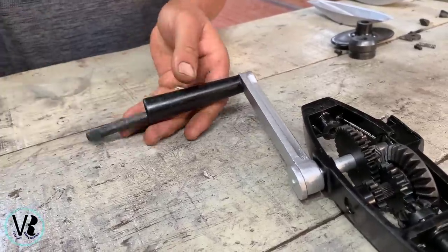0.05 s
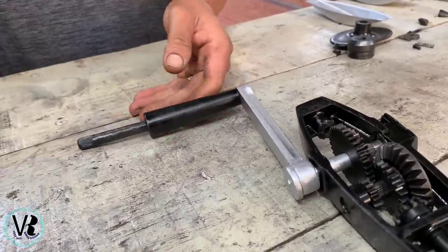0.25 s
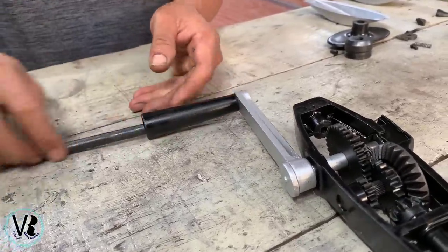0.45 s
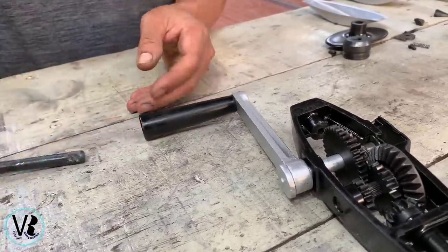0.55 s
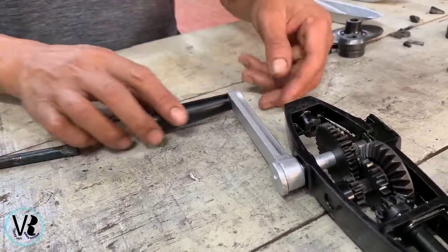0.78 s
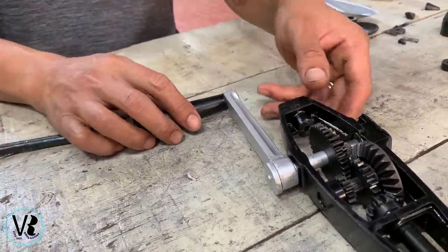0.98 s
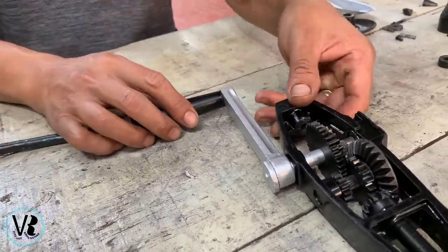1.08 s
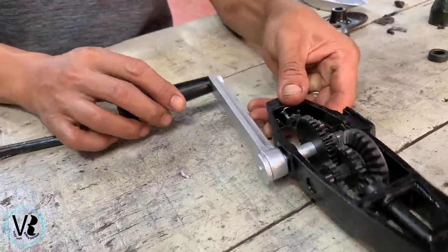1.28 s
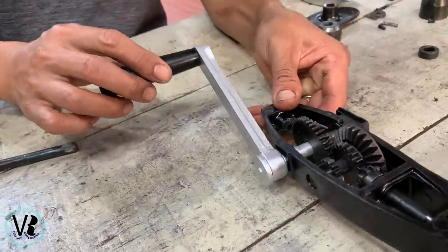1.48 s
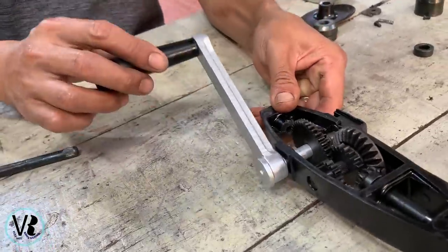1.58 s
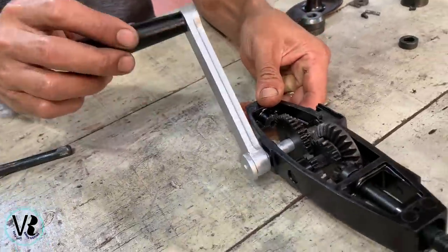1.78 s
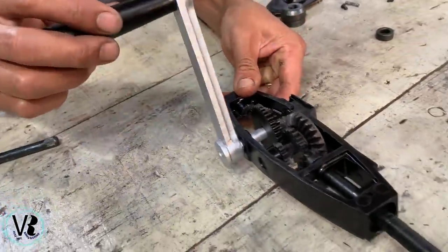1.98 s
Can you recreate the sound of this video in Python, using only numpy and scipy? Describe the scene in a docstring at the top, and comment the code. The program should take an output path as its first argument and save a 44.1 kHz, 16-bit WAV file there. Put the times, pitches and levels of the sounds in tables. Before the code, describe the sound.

An old hand drill knocks and slides on a wooden workbench, close by in a small quiet room. At about 0.2 seconds its crank drops with a loud, briefly ringing clatter. More bumps and scrapes lead to a steel rod clacking down at 0.65 seconds. Softer dragging fades by 1.3 seconds, leaving very faint gear friction. Thin, barely audible high chirps come and go from 0.8 to 2 seconds.

```python
"""Hand drill on a workbench.

An old hand drill bumps and slides on wooden boards in a small, quiet room. Its crank drops and clatters; a
steel rod is put down with a clack. Each contact rings modes of the boards, plus those of the frame or rod when
these land. The drill is dragged and its gears sing faintly by friction. Thin high chirps, perhaps distant
birds, come and go; one squeak near 1.52 s goes with a scrape."""
import sys
import numpy as np
from scipy import signal
from scipy.fft import rfft, irfft
from scipy.io import wavfile

SR = 44100
rng = np.random.default_rng(int(sys.argv[2]) if len(sys.argv) > 2 else 0)


def digitize_waveform(pressure):
    """Quantize a signal to 16-bit integers and store it at the path in sys.argv[1].

    Rows of a 2-D input are taken as channels; values are limited to [-1, 1].
    """
    field = np.atleast_2d(pressure).T
    bounded = np.clip(field, -1, 1)
    quanta = np.round(bounded * 32767).astype(np.int16)
    wavfile.write(sys.argv[1], SR, quanta)


N = 90404
HZ = np.fft.rfftfreq(8192, 1 / SR)  # filter design grid

# board modes: pitch_hz, level_db, t60_s
BENCH_MODES = [(85.6, 13.5, 0.52), (214, -1, 0.22), (289.7, -3.5, 0.46), (475.6, 3.5, 0.35),
               (521, 3, 0.032), (644, -2, 0.14), (846, 0.5, 0.072), (1058, -4.5, 0.25), (1110, -1, 0.1)]
# decay of dense short modes: freq_hz, t60_s
SCATTER_DECAY = [(100, 0.3), (400, 0.064), (1200, 0.084), (4000, 0.095), (12000, 0.025)]
# room decay: freq_hz, t60_s
ROOM_DECAY = [(90, 0.36), (300, 0.67), (1000, 0.36), (3000, 0.39), (7000, 0.18), (14000, 0.12)]


def amp(db):
    """Decibels to gain."""
    return 10 ** (np.asarray(db) / 20)


def unit(x):
    """Scale to rms 1."""
    return x / np.sqrt(np.mean(x ** 2) + 1e-20)


def read(points, hz):
    """Interpolate a table over log frequency."""
    freq_hz, value = np.transpose(points)
    return np.interp(np.log(hz + 1), np.log(freq_hz + 1), value)


def add(mix, start_s, sound):
    """Mix a sound in at start_s."""
    part = mix[:, max(round(start_s * SR), 0):][:, :sound.shape[-1]]
    part += sound[..., :part.shape[1]]


def colour(x, gain_db):
    """Minimum-phase filter, gain given on the grid HZ."""
    log_gain = np.log(amp(np.r_[gain_db, gain_db[-2:0:-1]]))
    response = np.exp(np.conj(signal.hilbert(log_gain)))[:len(HZ)]
    taps = irfft(response)[:len(HZ)]
    return signal.fftconvolve(x, taps[None], axes=1)[:, :x.shape[1]]


def shelves(bass_db, treble_db, bass_hz=450, treble_hz=1800):
    """Shelf curve in dB: heavy contacts have more bass, hard ones more treble."""
    return bass_db / (1 + (HZ / bass_hz) ** 4) + treble_db / (1 + (treble_hz / (HZ + 1)) ** 4)


def close_pair(x, bend_s=0):
    """Close source, left leading. Bending waves lag by bend_s at 1 kHz, more in the bass."""
    # phase lead of left over right: freq_hz, lead_rad
    left_lead = [(100, 0.6), (700, 0.5), (1000, 0.82), (1400, 1.25), (2000, 2.11), (2800, 3.13),
                 (4000, 4.7), (5600, 8.47), (8000, 11.05)]
    size = 2 * len(x)
    hz = np.fft.rfftfreq(size, 1 / SR)
    left = rfft(x, size) * np.exp(-4j * np.pi * bend_s * np.sqrt(1000 * hz))
    right = left * np.exp(-1j * read(left_lead, hz))
    return irfft([left, right])[:, :len(x)]


def diffuse(size):
    """White noise from all sides, alike left and right in the bass."""
    # left-right likeness: freq_hz, correlation
    likeness = [(100, 0.99), (350, .8), (600, 0.67), (1000, 0.18), (2000, -0.5), (2800, -0.25),
                (4500, 0.27), (12000, -0.37)]
    left, other = rfft(rng.standard_normal((2, size)))
    correlation = np.clip(read(likeness, np.fft.rfftfreq(size, 1 / SR)), -1, 1)
    right = correlation * left + np.sqrt(1 - correlation ** 2) * other
    return irfft([left, right], size)


def tail(decay, size):
    """Diffuse decay of about unit energy, each band at its own rate."""
    hz, t, bands = signal.stft(diffuse(size), SR, nperseg=256)
    tau_s = read(decay, hz)[:, None] / np.log(1000)
    fading = bands * np.exp(-t / tau_s) * np.sqrt(2 / (tau_s * SR))
    return signal.istft(fading, SR, nperseg=256)[1][:, :size]


def room_tone(level_db=-58):
    """Steady diffuse noise, mostly bass."""
    # noise spectrum: freq_hz, relative_db
    spectrum = [(25, -34), (60, -14), (108, 0), (170, -5), (340, -5.5), (460, -12), (700, -15),
                (1300, -19.5), (2000, -19), (3400, -32), (5000, -30), (7200, -30.5), (9000, -34.5),
                (11000, -42), (13000, -62.5), (16000, -74.5)]
    return amp(level_db) * unit(colour(diffuse(N), read(spectrum, HZ)))


def reverb(x, delay_s=.008):
    """Short room reverberation, fed by the left channel."""
    # reverberation colour: freq_hz, gain_db
    tone = [(90, -20.5), (250, -12.5), (500, -17), (1200, -14), (2600, -15.5), (3900, -19), (4700, -10),
            (6500, -7.5), (14000, -9)]
    response = colour(tail(ROOM_DECAY, SR), read(tone, HZ))
    out = np.zeros((2, N))
    add(out, delay_s, signal.fftconvolve(x[:1], response, axes=1))
    return out


def chirps(direct_db=-10, echo_db=-1):
    """Thin gliding whistles, blurred by the room."""
    # whistles: start_s, length_s, start_hz, end_hz, width_hz, level_db; the one at 1.517 s is a squeak of the
    # scrape
    whistles = [(0.813, 0.057, 6660, 5770, 700, -65.5), (1.027, 0.063, 6330, 7560, 304, -64),
                (1.137, 0.058, 7170, 7650, 403, -68), (1.161, 0.048, 6360, 6490, 400, -64),
                (1.292, 0.064, 7130, 6240, 394, -67.5), (1.517, 0.044, 5100, 5010, 700, -72),
                (1.658, 0.081, 7200, 5870, 503, -68), (1.794, 0.033, 6200, 6350, 400, -72.5),
                (1.822, 0.033, 7250, 7080, 200, -63), (1.853, 0.051, 6620, 6450, 180, -60.5),
                (1.974, 0.046, 6800, 6180, 1200, -71.5)]
    out = np.zeros((2, N))
    for start_s, length_s, start_hz, end_hz, width_hz, level_db in whistles:
        progress = np.arange(0, length_s, 1 / SR) / length_s
        lowpass = signal.butter(2, width_hz / 2, fs=SR, output="sos")
        flutter = signal.sosfilt(lowpass, rng.standard_normal(SR))[-len(progress):]
        pitch_hz = start_hz + (end_hz - start_hz) * progress
        whistle = np.sin(2 * np.pi * np.cumsum(pitch_hz) / SR)
        add(out, start_s, amp(level_db) * unit(whistle * flutter * np.sin(np.pi * progress) ** .5))
    echo = signal.fftconvolve(out, tail(ROOM_DECAY, SR), axes=1)[:, :N]
    return amp(direct_db) * out + amp(echo_db) * echo


def gears(width_hz=14):
    """Light friction rings narrow gear resonances as the crank turns."""
    # gear catches: start_s, length_s, pitch_hz, level_db
    catches = [(1.35, 0.081, 2182, -71.5), (1.409, 0.062, 1547, -71), (1.487, 0.071, 2035, -71),
               (1.491, 0.18, 1550, -71), (1.507, .33, 1755, -73.5), (1.566, 0.072, 2640, -74.5)]
    out = np.zeros((2, N))
    for start_s, length_s, pitch_hz, level_db in catches:
        progress = np.arange(0, length_s, 1 / SR) / length_s
        resonator = signal.iirpeak(pitch_hz, pitch_hz / width_hz, SR)
        song = signal.lfilter(*resonator, diffuse(SR))[:, -len(progress):]
        add(out, start_s, amp(level_db) * unit(song * np.sin(np.pi * progress) ** .5))
    return out


def ring(modes, click_db, bend_s=.00099):
    """A click and its damped modes, carried through the boards as a bending wave."""
    t = np.arange(SR // 2) / SR
    ringing = np.zeros(len(t))
    for pitch_hz, level_db, t60_s in modes:
        tau_s = t60_s / np.log(1000)
        ringing += amp(level_db) * 2 / (tau_s * SR) * np.exp(-t / tau_s) * np.cos(2 * np.pi * pitch_hz * t)
    return close_pair(ringing + amp(click_db) * signal.unit_impulse(len(t)), bend_s)


def slides(grains_per_s=1200, spread_db=2.5, spots=4):
    """Metal catches on wood grain: streams of tiny clicks at spots that each ring differently."""
    # sliding strokes: start_s, length_s, level_db, bass_db, treble_db
    strokes = [(0.071, 0.34, -44, 12.5, 0), (0.442, 0.025, -46, 3, 6), (0.467, 0.071, -37.5, -0.5, 3),
               (0.532, 0.15, -42.5, 4, 2), (0.74, 0.12, -48, 12.5, 6), (0.899, 0.11, -41, 1.5, -4),
               (0.997, 0.055, -43.5, 6.5, -5), (1.055, 0.15, -60.5, 15, -26),
               (1.183, 0.14, -55.5, 17.5, 12.5), (1.518, 0.06, -69, 6, 23)]
    # friction colour: freq_hz, relative_db
    tone = [(40, -40), (90, -9), (130, -12), (400, -7.5), (560, 0), (700, 4.5), (850, -3), (1140, 1),
            (1300, -8.5), (2100, -13), (2450, -11), (4000, -24.5), (8000, -32), (15000, -56)]
    out = np.zeros((2, N))
    direct = ring(BENCH_MODES, click_db=-4)
    size = direct.shape[1]
    t = np.arange(size) / SR
    for start_s, length_s, level_db, bass_db, treble_db in strokes:
        progress = np.minimum(t / length_s, 1)
        pressure = abs(np.sin(np.pi * progress ** .8)) ** 1.1  # one arch, peaking early
        tone_db = read(tone, HZ) + shelves(bass_db, treble_db)
        for _ in range(spots):
            signs = rng.choice([-1, 1], size)
            strengths = amp(spread_db * np.minimum(rng.exponential(1, size), 3))
            caught = rng.random(size) < grains_per_s / spots / SR
            force = pressure * unit(signs * strengths * caught) / np.sqrt(spots)
            body = colour(direct + tail(SCATTER_DECAY, size), tone_db)
            body /= np.linalg.norm(body[0])
            add(out, start_s, amp(level_db) * signal.fftconvolve(force[None], body, axes=1))
    return out


def impacts(hits, tone, modes, click_db, rattle_db, scatter_db):
    """Each hit clicks, rattles briefly and rings clear modes plus a scatter of short ones."""
    # contact rattle: freq_hz, t60_s
    rattle_decay = [(100, 0.035), (600, 0.06), (2500, 0.0062), (10000, 0.06)]
    out = np.zeros((2, N))
    direct = ring(modes, click_db)
    size = direct.shape[1]
    for start_s, level_db, bass_db, treble_db in hits:
        rattle = amp(rattle_db) * close_pair(tail(rattle_decay, size)[0])
        scatter = amp(scatter_db) * tail(SCATTER_DECAY, size)
        tone_db = read(tone, HZ) + shelves(bass_db, treble_db)
        add(out, start_s, amp(level_db) * colour(direct + rattle + scatter, tone_db))
    return out


def bumps():
    """Light knocks of the drill, and the steel rod's tip falling on the bench, ring the boards."""
    # knocks: start_s, level_db, bass_db, treble_db
    hits = [(.0375, 14, 3, -0.5), (.0575, 8, 4, 1.5), (.0835, -10.5, -2.5, 20), (.094, -12, -1, 17.5),
            (.1003, 0, 2.5, -17.5), (.1272, 1.5, 10.5, -22), (.153, -0.5, 2, -0.5), (.173, -9, 2.5, -3.5),
            (.2025, 10.5, -4.5, 9), (.4765, 4, -19.5, 5.5), (.5575, 10, -5, 9), (.782, -6.5, -2, -7),
            (.8158, -3, 0.5, 1), (1.191, -15, -15, 1)]
    # contact colour: freq_hz, gain_db
    tone = [(40, -43), (90, -12.5), (170, -6), (300, -3.5), (500, 1.5), (1000, 0.5), (1450, -8.5),
            (1800, -12), (2500, -11.5), (4000, -29.5), (8000, -44), (15000, -55)]
    return impacts(hits, tone, BENCH_MODES, click_db=-18, rattle_db=-7.5, scatter_db=-4.5)


def rod_clack():
    """The steel rod is put down and settles; rod and boards ring."""
    # rod contacts: start_s, level_db, bass_db, treble_db
    hits = [(.6410, 18, -1, -1), (.6470, -9, -7.5, -11), (.6515, 0.5, -1.5, -4)]
    # contact colour: freq_hz, gain_db
    tone = [(40, -23), (100, -11.5), (300, -5), (600, -5), (1050, -1.5), (1750, -4), (2400, 5), (3000, 1),
            (3900, -6), (4500, -13), (5600, -12.5), (8000, -27), (10500, -22), (15000, -51.5)]
    # rod modes: pitch_hz, level_db, t60_s
    rod_modes = [(1036, 4, 0.067), (2370, -5, 0.025), (2593, 7, 0.023), (3552, -1, 0.028),
                 (3935, 11.5, 0.016), (4520, -20, 0.057), (5960, -14, 0.048), (6620, 10, 0.055)]
    return impacts(hits, tone, BENCH_MODES + rod_modes, click_db=-12, rattle_db=-6.5, scatter_db=-5.5)


def crank_drop():
    """The crank drops, lands and clatters; drill frame and boards ring."""
    # crank contacts: start_s, level_db, bass_db, treble_db
    hits = [(.22377, 23, -10.5, -8.5), (.22718, 16, -10, -9), (.23176, 22, 5.5, 2), (.23505, 22.5, 6, -1.5),
            (.23879, 17.5, 2, -10.5), (.24268, 2.5, -9.5, -7), (.24472, 10.5, -9, -3), (.2495, 9, -3.5, -4),
            (.2595, 8, -0.5, -6)]
    # contact colour: freq_hz, gain_db
    tone = [(40, -46.5), (90, -9.5), (130, -3), (200, -6), (340, -7), (405, -5), (490, 2), (570, -6.5),
            (800, -2.5), (1010, -13), (1170, -5), (1600, -3), (1900, 0.5), (2150, -3), (2700, 1.5),
            (4200, -16.5), (8000, -26.5), (15000, -44.5)]
    # drill frame modes: pitch_hz, level_db, t60_s
    frame_modes = [(360, 5, 0.28), (467.4, 11, 0.16), (696, -0.5, 0.066), (802, 9.5, 0.14), (928, 0, .3),
                   (1104, 7.5, 0.025), (1269.4, 4.5, 0.086), (1313, 0, 0.12), (1495, 0.5, .18),
                   (1660, -2, .28), (1878, 0.5, 0.23), (1970, -4.5, 0.043), (2570, 0.5, 0.027),
                   (2580, 2.5, 0.13), (3832, 11.5, 0.021)]
    return impacts(hits, tone, BENCH_MODES + frame_modes, click_db=-6, rattle_db=-5, scatter_db=-9)


def scene(rod_send_db=-1):
    """Contacts and slides slightly left, with reverberation, gears, chirps and room tone."""
    # level of left over right: freq_hz, gain_db
    balance = [(90, 1.5), (300, 4.5), (500, 3), (1000, 4), (2000, 2), (3000, -2.5), (10000, 4.5)]
    handling = bumps() + slides()
    crank = crank_drop()
    rod = rod_clack()
    tool = handling + crank + rod
    lean_db = read(balance, HZ) / 2
    close = np.vstack([colour(tool[:1], lean_db), colour(tool[1:], -lean_db)])
    echo = reverb(handling + crank + amp(rod_send_db) * rod)
    return close + echo + gears() + chirps() + room_tone()


def record(dry, ceiling=.75, low_cut_hz=66, high_cut_hz=15900):
    """Soft overload on the hardest peaks, bass cut, band limit."""
    clipped = dry / (1 + (dry / ceiling) ** 4) ** .25
    highpass = signal.butter(4, low_cut_hz, "high", fs=SR, output="sos")
    lowpass = signal.firwin(511, high_cut_hz, window=("kaiser", 9), fs=SR)
    return signal.oaconvolve(signal.sosfilt(highpass, clipped), lowpass[None], "same")


dry = scene()
out = record(dry)
digitize_waveform(out)
```